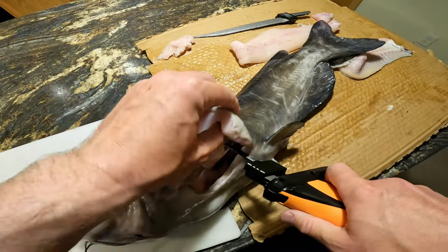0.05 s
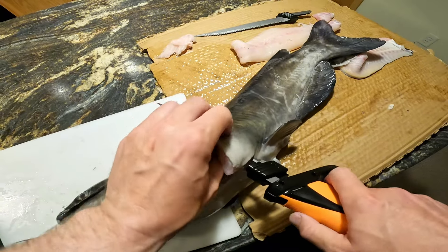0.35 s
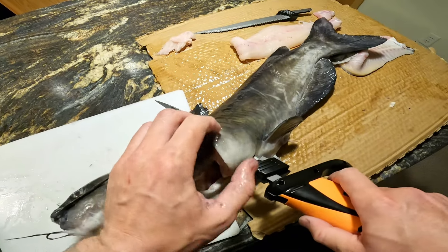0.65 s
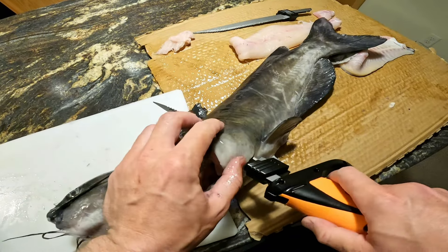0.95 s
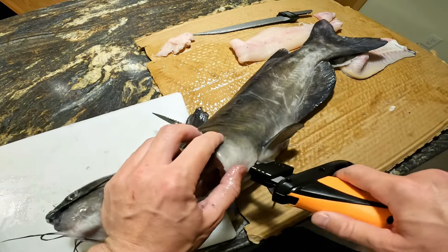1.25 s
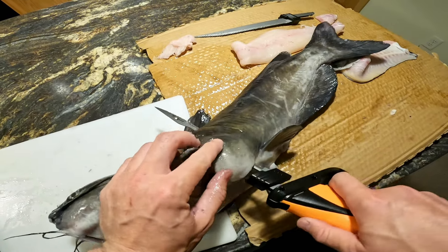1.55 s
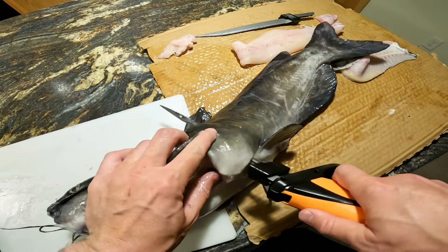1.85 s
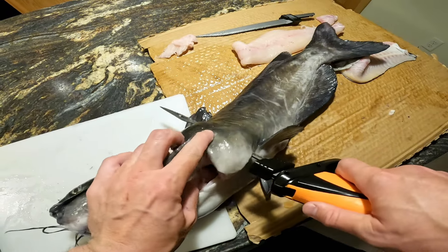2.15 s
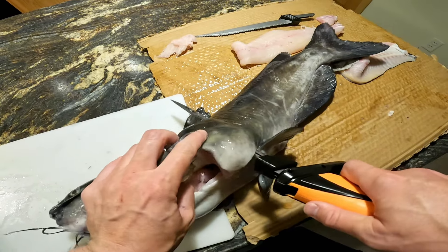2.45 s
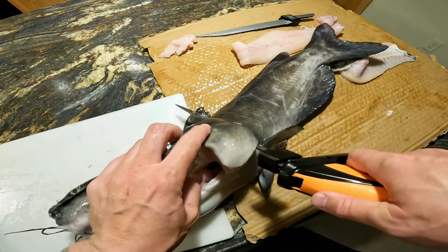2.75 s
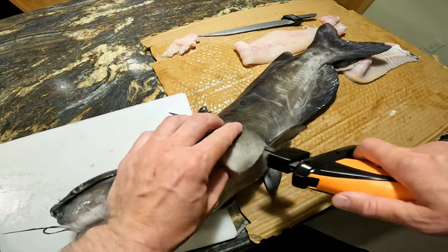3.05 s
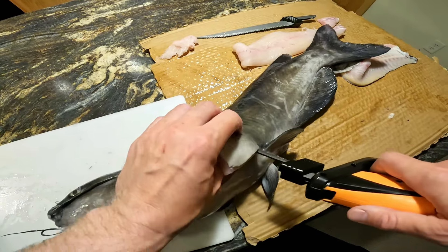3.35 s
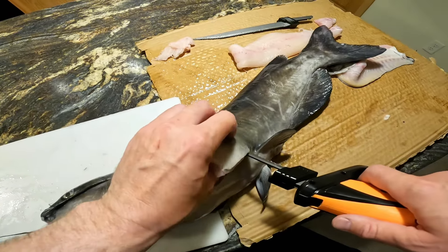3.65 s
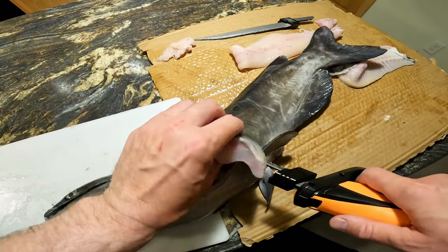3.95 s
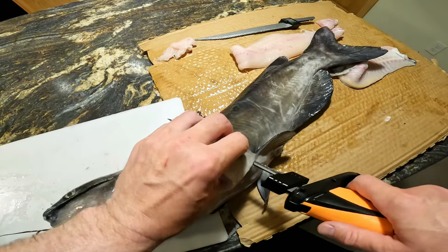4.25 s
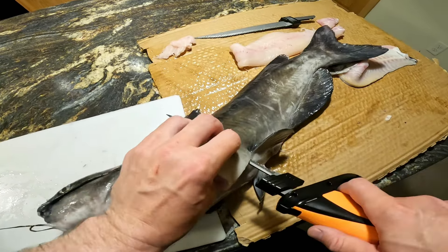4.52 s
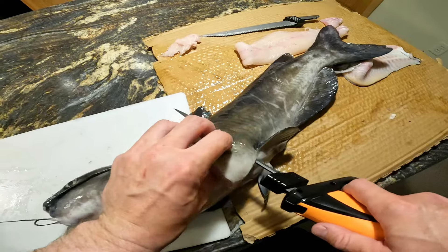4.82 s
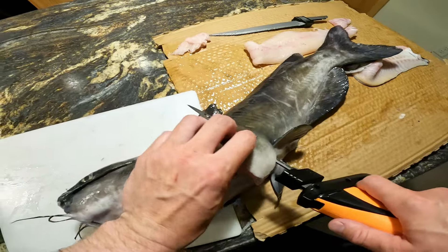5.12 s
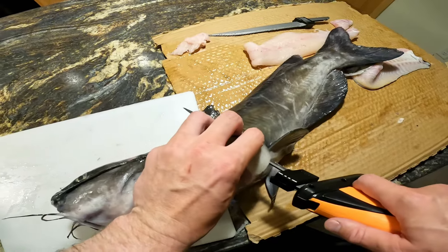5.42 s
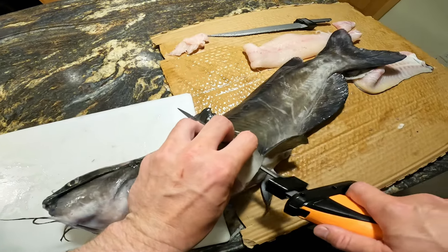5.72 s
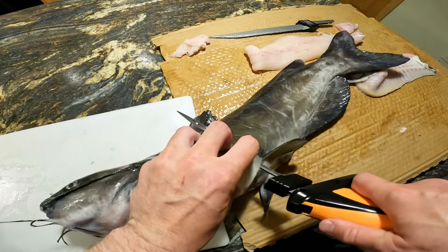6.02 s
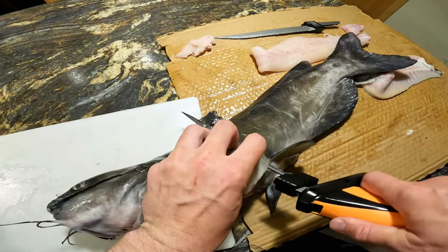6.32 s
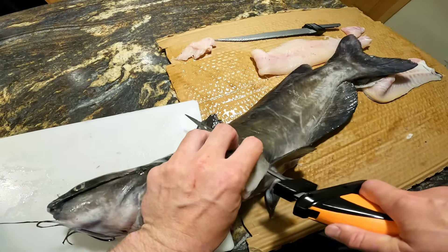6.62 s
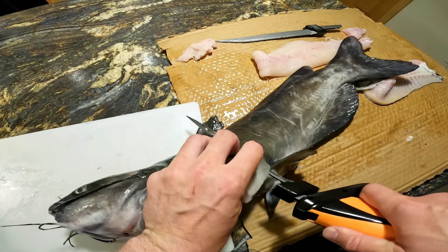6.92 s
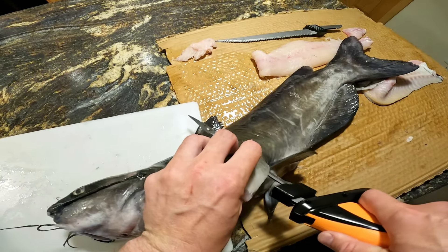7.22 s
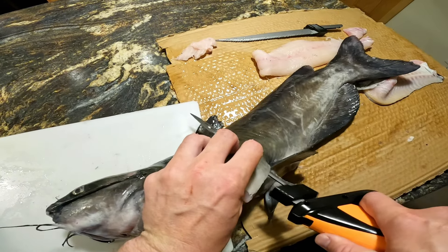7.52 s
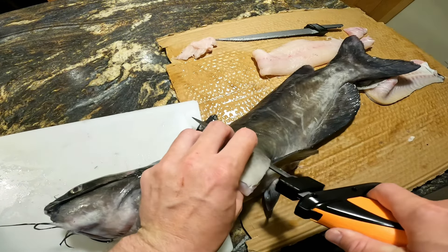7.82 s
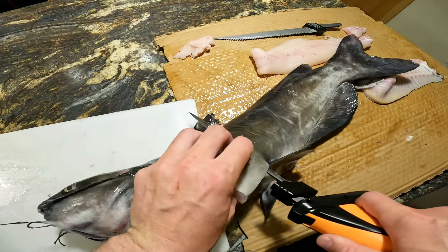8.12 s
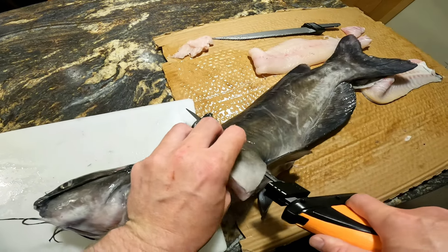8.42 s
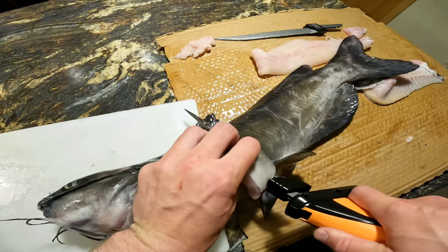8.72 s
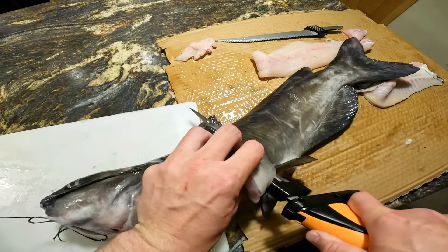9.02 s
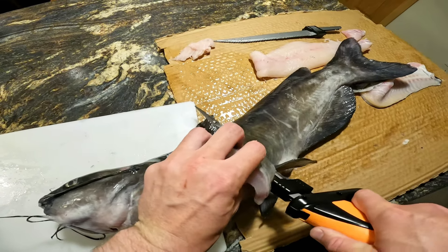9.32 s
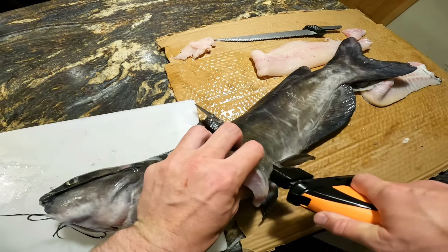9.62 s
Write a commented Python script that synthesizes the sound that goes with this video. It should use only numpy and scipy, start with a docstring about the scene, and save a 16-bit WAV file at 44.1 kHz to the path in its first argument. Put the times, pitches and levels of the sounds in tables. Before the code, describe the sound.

In a small room with a low ventilation hum, wet fish skin and small bones snap faintly under a hand. An electric fillet knife clicks on close to the microphone, buzzing, rattling and rasping through the fish, then whistles down to a stop. More small snaps and soft squelches follow. The knife runs again for longer, coasts down with a few clacks, and starts a third time near the end.

```python
"""At a counter in a small room, close by, an electric fillet knife runs three times through a fish.
A geared motor cranks two serrated blades to and fro: backlash makes them knock at each reversal,
sliding friction makes them rasp, and the gears sing at multiples of the crank rate until the knife
coasts to a stop. In the pauses wet skin and small bones snap under the hand, over the room's hum."""
import sys
import numpy as np
from scipy import signal
from scipy.fft import rfft, irfft
from scipy.io import wavfile
from scipy.ndimage import uniform_filter1d

SR = 44100
rng = np.random.default_rng(int(sys.argv[2]) if len(sys.argv) > 2 else 0)


def transcribe(u):
    """Save the signal u as a 16-bit wav file named by the first command-line argument.

    u: samples, shape (n,) or (channels, n), limited to [-1, 1]; the rate is SR.
    q: integer samples, one column per channel.
    """
    v = np.clip(np.atleast_2d(u).T, -1, 1)
    q = np.round(v * 32767).astype(np.int16)
    wavfile.write(sys.argv[1], SR, q)


N = 430416
TIME, FREQ = np.arange(N) / SR, np.fft.rfftfreq(N, 1 / SR)


def amp(db):
    """Amplitude ratio of a level in decibels."""
    return 10 ** (np.asarray(db) / 20)


def unit(x):
    """Normalisation to rms 1."""
    return x / np.sqrt(np.mean(x ** 2) + 1e-20)


def unit_pulse(x):
    """Normalisation to the energy of five milliseconds at rms 1."""
    return x / np.sqrt(np.sum(x ** 2) / (.005 * SR))


def curve(points, hz):
    """Interpolation on a logarithmic frequency axis."""
    f, value = np.transpose(points)
    return np.interp(np.log(hz + 1), np.log(f + 1), value)


def band(hz, lo_hz, hi_hz):
    """Band-pass magnitude with sixth-order edges."""
    return 1 / np.sqrt((1 + (lo_hz / (hz + 1)) ** 12) * (1 + (hz / hi_hz) ** 12))


def colour(x, gain):
    """Minimum-phase filter with the magnitude gain(hz)."""
    log_gain = np.log(np.maximum(gain(abs(np.fft.fftfreq(4096, 1 / SR))), 1e-5))
    taps = np.fft.ifft(np.exp(np.conj(signal.hilbert(log_gain)))).real[:2048]
    return signal.oaconvolve(x, taps)[:len(x)]


def drift(hz):
    """Random fluctuation: low-passed noise of rms 1."""
    return unit(irfft(rfft(rng.standard_normal(N)) / (1 + (FREQ / hz) ** 4), N))


def tone(turns, order, waver_db=2):
    """Random amplitude modulation of a sinusoid at one multiple of a rotation rate."""
    knots = np.arange(0, TIME[-1] + 1, 1 / 14)
    size = np.interp(TIME, knots, amp(waver_db * rng.standard_normal(len(knots))))
    return np.sqrt(2) * size * np.sin(2 * np.pi * (order * turns + rng.random()))


def add(mix, s, sound):
    """Superposition of a sound starting at s seconds."""
    part = mix[max(round(s * SR), 0):][:len(sound)]
    part += sound[:len(part)]


def during(start, end, edge_s):
    """Trapezoidal window from start to end."""
    return np.clip(np.minimum(TIME - start, end - TIME) / edge_s + .5, 0, 1)


def lifts(rows, edge_s):
    """Level envelopes, one a gain column, each row held from its start to its end."""
    return sum(np.outer(dbs, during(start, end, edge_s)) for start, end, *dbs in rows)


# ventilation spectrum: f/Hz, relative level/dB
VENTILATION = [(12, -29.5), (20, 2.5), (90, -8.5), (129, -6), (294, -6), (337, -3), (386, -12.5),
               (481, -12.5), (536, -17.5), (809, -29), (879, -31), (1220, -25), (2490, -44), (6320, -45),
               (14000, -63)]
# an appliance's hum and a thin whine: f/Hz, level/dB
HUM = [(59.2, -67), (91.5, -62), (118.4, -55), (344.5, -67), (473.7, -73), (1184, -77)]
THIN_WHINE = [(3494, -85)]
def background(air_db=-46, side_db=-22, hiss_db=-76):
    """Broadband ventilation noise and a line spectrum of hum, with hiss uncorrelated between the ears."""
    mid, side = (unit(colour(noise, lambda hz: amp(curve(VENTILATION, hz))))
                 for noise in rng.standard_normal((2, N)))
    air = mid + amp(side_db) * np.array([side, -side])
    hum = sum(amp(db) * tone(hz * TIME, order=1, waver_db=1.5) for hz, db in HUM + THIN_WHINE)
    hiss = np.array([unit(colour(noise, lambda hz: band(hz, 1700, 6700)))
                     for noise in rng.standard_normal((2, N))])
    return amp(air_db) * air + hum + amp(hiss_db) * hiss


# snaps of skin and bone, and trigger clicks: t/s, relative level/dB of the middle, low and top bands
SNAPS = [(0.1398, -54, -34.5, -58), (0.2688, -39, -56, -52), (0.7784, -49, -51, -61),
         (1.215, -53, -35.5, -65), (1.269, -42, -36, -70), (1.305, -53, -40, -74), (1.37, -60, -54, -60),
         (1.4694, -33, -33, -64), (1.5706, -32.5, -28.5, -48), (1.6192, -41, -37, -72),
         (3.728, -31, -34.5, -48), (3.8516, -28, -41, -49), (3.9774, -43, -66, -61),
         (4.1742, -27, -40, -46.5), (4.1892, -40, -56, -52), (4.2084, -27, -35, -46),
         (4.618, -23.5, -38, -45), (4.6498, -45, -55, -70), (4.7316, -43, -73, -56),
         (4.7459, -30, -33.5, -43), (4.8978, -51, -53, -58), (4.9147, -33.5, -34.5, -47),
         (4.996, -34, -38, -46.5), (5.4091, -64, -62, -55), (5.4805, -41, -35, -59),
         (5.5398, -30, -33, -47.5), (5.6, -56, -38.5, -72), (5.7179, -49, -38, -65),
         (8.3938, -44, -37, -60.5), (8.5589, -55, -57.5, -48), (8.8702, -34.5, -40, -50.5),
         (8.942, -47, -45, -72)]
TRIGGER_CLICKS = [(1.649, -24.5, -37, -51.5), (5.755, -46, -25, -57), (8.975, -29, -19.5, -35)]
# spectrum common to both: f/Hz, gain/dB
SNAP_SPECTRUM = [(410, -14.5), (700, -11), (2110, -7), (2550, -7), (2900, -11), (3350, -11), (3750, -5),
                 (4150, -11.5), (4700, -5), (7670, -11.5), (8370, -20.5), (12000, -20.5), (14000, -30)]
def snaps(rise_s=.00089, decay_s=.0013, tail_s=.016, tail_db=-24):
    """Impulsive excitation: each snap or click is a millisecond of crackle with a faint damped tail."""
    t, out = np.arange(3000) / SR, np.zeros(N)
    envelope = (1 - np.exp(-t / rise_s)) * (np.exp(-t / decay_s) + amp(tail_db) * np.exp(-t / tail_s))
    for s, middle, low, top in [*SNAPS, *TRIGGER_CLICKS]:
        tilt = [(1400, low + 3), (4200, middle - 5), (10000, top + 12)]
        spectrum = lambda hz: amp(curve(tilt, hz) + curve(SNAP_SPECTRUM, hz)) * band(hz, 500, 16000)
        burst = .54 * unit(rng.standard_normal(len(t)) * envelope)
        add(out, s, colour(burst, spectrum))
    return out


# wet flesh sliding under the fingers: t/s, duration/s, centre f/Hz, width/octaves, level/dB
SQUELCHES = [(0.393, 0.21, 4700, 0.78, -71.5), (1.114, 0.72, 3360, 0.78, -73),
             (3.882, 0.1, 5000, 0.19, -66), (3.974, 0.01, 4870, 0.12, -51.5),
             (3.844, 0.26, 9000, 0.77, -71.5), (4.62, 0.12, 4500, 0.44, -73),
             (4.976, 0.12, 4930, 0.68, -67), (8.451, 0.41, 4950, 0.59, -79)]
def squelches(grain_db=5):
    """Stick-slip friction: tiny sticky grains of noise swell and fade as the flesh slides."""
    out = np.zeros(N)
    for s, length, centre, width, db in SQUELCHES:
        count = int(length * SR)
        noise = rng.standard_normal(count)
        grains = amp(grain_db * unit(uniform_filter1d(rng.standard_normal(count), size=120)))
        sound = colour(noise * grains, lambda hz: np.exp(-.5 * (np.log2((hz + 1) / centre) / width) ** 2))
        add(out, s, amp(db) * unit(sound * np.hanning(count)))
    return out


# pulls of the trigger: pressed t/s, drive catches t/s, released t/s, coasting duration/s,
# base level/dB of rattle, clatter, scrape, sizzle, starting whine, unloaded gears
RUNS = [(1.648, 1.668, 2.9, .755, -28, -28, -26.5, -39, -25.5, -24),
        (5.753, 5.759, 7.79, .57, -29, -28, -27, -43, -21, -36),
        (8.975, 8.986, 10.0, .7, -28, -28, -28, -40, -23.5, -38)]
# crank rate under power, sagging with the load, one curve a run: t/s, f/Hz
CRANK_RATE = [
    [(1.85, 35.7), (2.03, 35.7), (2.18, 35.25), (2.36, 35.0), (2.44, 35.7), (2.58, 35.8), (2.64, 35.2),
     (2.8, 35.2), (2.9, 36.2)],
    [(5.92, 35.8), (5.976, 35.8), (6.084, 35.5), (6.724, 35.4), (6.93, 35.1), (7.21, 34.9), (7.76, 35.0)],
    [(9.15, 35.8), (9.204, 35.9), (9.404, 35.2), (9.474, 35.2), (9.616, 35.7), (9.74, 35.4)],
]
def motor(spin_up_s=.026, coast_power=1.2, slack_db=-9, catch_s=.0085, surge_s=.1, unload_s=.088):
    """Rotational inertia: the crank nears full speed exponentially; once released, friction stops it."""
    pressed, catch, released, coast, *_ = run_settings()
    time_on, time_off = np.maximum(TIME - pressed, 0), np.maximum(TIME - released, 0)
    slowing = np.maximum(1 - time_off / coast, 0) ** coast_power
    pace = (1 - np.exp(-time_on / spin_up_s)) * slowing  # share of full speed
    full_hz = np.interp(TIME, *np.concatenate(CRANK_RATE).T)
    turns = np.cumsum(pace * full_hz * (1 + .001 * drift(25))) / SR
    engaged = amp(slack_db * np.clip(1 - (TIME - catch) / catch_s, 0, 1))  # quiet until slack is taken up
    surge = np.exp(-time_on / surge_s)  # starting torque
    unloaded = np.minimum(time_off / unload_s, 1)
    return turns, pace, engaged, surge, unloaded


def current_run():
    """Step function of time: the index of the latest pull of the trigger."""
    return np.maximum(np.searchsorted([row[0] for row in RUNS], TIME) - 1, 0)


def run_settings():
    """Step functions of time: the columns of RUNS for the latest pull."""
    return np.array(RUNS)[current_run()].T


# impacts within one crank turn: phase/turns, relative level/dB in rattle, clatter, scrape, sizzle
KNOCKS = [(.03, -2, 0, 0, -3), (.125, 0, -8, -5, -9), (.22, -2, -11, -8, -3), (.53, -2, -1, -.5, -3),
          (.625, -1, -6, -5, -7), (.71, -3, -12, -10, -2)]
def knocks(turns, pace, part, ring_s, scatter_turns=.0012, spread_db=1.1, wander_rad=.17):
    """Backlash: slack is taken up at each reversal and the blades bounce, more softly when slow."""
    t, out = np.arange(1024) / SR, np.zeros(N)
    for phase, *dbs in KNOCKS:
        due = np.arange(int(turns[-1])) + phase
        late, size, step = rng.standard_normal((len(due), 3)).T
        at = np.minimum(np.searchsorted(turns, due + scatter_turns * late), N - 1)
        forces = amp(dbs[part] + spread_db * size) * pace[at] ** .48
        # the point of contact wanders slowly, blending two short rings
        first, second = (unit(rng.standard_normal(len(t)) * np.exp(-t / ring_s)) for _ in range(2))
        for s, force, contact in zip(TIME[at], forces, np.cumsum(wander_rad * step)):
            add(out, s, force * (np.cos(contact) * first + np.sin(contact) * second))
    return out / np.std(out[pace > .9])


def rasp(turns, pace, peak_phase, steady, fade_strokes=.4, profile_points=1250):
    """Sliding friction of serrations peaks once a stroke over a steady rub; two independent signals."""
    stroke = 2 * (turns - peak_phase) % 1
    periodic_share = .5 * pace ** 2  # the same teeth meet in every turn, so part of the noise repeats
    profile = rng.standard_normal((2, profile_points))
    periodic = np.sqrt(periodic_share) * profile[:, (turns % 1 * profile_points).astype(int)]
    aperiodic = np.sqrt(1 - periodic_share) * rng.standard_normal((2, N))
    return unit((steady + np.exp(-stroke / fade_strokes)) * (periodic + aperiodic))


# spectrum of the mechanism, one curve a run: f/Hz, gain/dB
BODY_SPECTRA = [
    [(120, -31.5), (200, -24.5), (280, 2.5), (312, -11), (422, 2), (461, -9), (541, 12), (745, 2),
     (939, 2.5), (2500, -8.5), (2830, -10), (5360, -12), (8660, -24.5), (10900, -21), (14000, -31.5)],
    [(120, -62.5), (200, -67.5), (280, 20.5), (312, -23.5), (461, 3), (602, 6.5), (815, 1), (922, 2),
     (1250, 4), (2050, -7.5), (2500, -6.5), (7380, -16.5), (8510, -27.5), (9300, -19), (10500, -19),
     (11400, -14), (14000, -25)],
    [(120, -44), (200, -19), (280, -9), (312, -22), (461, -28), (591, -4.5), (829, -8), (922, -5.5),
     (1480, -5.5), (2020, -9), (3150, -8), (3820, -7), (5460, -4.5), (8510, -16), (11700, -13),
     (14000, -25)],
]
# modes of the housing and blades: f/Hz, bandwidth/Hz, gain/dB
BODY_MODES = [(572, 98, 1.5), (911, 89, 7), (1250, 470, 7), (1700, 550, 3), (2490, 290, 4.5),
              (3117, 96, 4.5), (5400, 230, 2.5), (7300, 200, 4), (11800, 760, 1)]
def housing(x, run, lo_hz, hi_hz):
    """Resonance: the modes of housing and blades filter one band of the excitation."""
    def gain(hz):
        peaks_db = sum(db / (1 + (2 * (hz - f) / width) ** 2) for f, width, db in BODY_MODES)
        return amp(curve(BODY_SPECTRA[run], hz) + peaks_db) * band(hz, lo_hz, hi_hz)
    return colour(x, gain)


# gearbox rattle, blade clatter, scrape and edge sizzle: low f/Hz, high f/Hz, knock decay/s,
# ratio of rasp to knocks, phase of the rasp's peak/turns, ratio of steady rub to that peak
PARTS = [(400, 1800, .003, .9, .1, .7), (1800, 3600, .0016, 1.05, .02, .5),
         (3600, 8000, .0018, 1.1, .03, .3), (8000, 15000, .002, 1.5, .21, .6)]
# the teeth cross bone: start t/s, end t/s, gain/dB of sizzle, rumble
RIBS = [(2.267, 2.44, 3.5, 7.5), (2.44, 2.8, 1.5, -3), (7.093, 7.883, 4, -13)]
# the blades sink deep and the gears labour: start t/s, end t/s, gain/dB of drone, whine, clatter, scrape
BITES = [(2.08, 2.76, 3, -5, -0.47, -0.74), (6.06, 6.28, 4, -4, 0.3, -1.2), (6.55, 7.1, 1.5, 2, 0.76, -2),
         (7.39, 7.85, 0, 2.5, -0.16, 0.2), (9.2, 9.5, 1, 1, 0.4, -1.1)]
# the coasting blades ease out of the cut: start t/s, end t/s, gain/dB of rattle, clatter, scrape, sizzle
FREEING = [(2.95, 3.4, -0.5, -1, -1, 0.5), (3.48, 3.66, 2, 2, 1, 3), (7.81, 8.4, 2, -2.5, -2.5, 2.5)]
def mechanism(turns, pace, engaged, surge, unloaded, surge_db=8, rumble_db=-43):
    """Source and filter: knocks and rasp sound through the housing; on coasting the treble dies first."""
    stereo_widths, speed_powers = [.05, .079, .11, .8], [.78, 1, 1.37, 1.43]  # part by part
    sizzle_db, bone_db = lifts(RIBS, edge_s=.016)
    _, _, clatter_db, scrape_db = lifts(BITES, edge_s=.045)
    changes_db = np.array([surge_db * surge, clatter_db, scrape_db, sizzle_db]) + lifts(FREEING, .08)
    runs, out = current_run(), np.zeros((2, N))
    for part, (lo_hz, hi_hz, ring_s, rasp_share, peak_phase, steady) in enumerate(PARTS):
        rub, stray = rasp(turns, pace, peak_phase, steady)
        force = knocks(turns, pace, part, ring_s) + rasp_share * rub
        gain = engaged * amp(changes_db[part]) * pace ** speed_powers[part]
        for run, (_, _, _, _, *levels_db) in enumerate(RUNS):
            now = (runs == run) & (pace > 0)
            mid = housing(force[now], run, lo_hz, hi_hz)
            side = housing(stereo_widths[part] * stray[now], run, lo_hz, hi_hz)
            full_speed_rms = np.sqrt(np.mean((mid ** 2 + side ** 2)[pace[now] > .9]))
            stereo = np.array([mid + side, mid - side]) / full_speed_rms
            out[:, now] += stereo * amp(levels_db[part]) * gain[now]
    flesh, gears = rasp(turns, pace, peak_phase=.1, steady=.6)
    rumble = unit(colour(flesh, lambda hz: band(hz, 62, 635)))  # passed through the flesh to the counter
    out += rumble * amp(rumble_db + bone_db) * pace ** 1.43
    loose_gears = unit(colour(gears, lambda hz: band(hz, 1000, 1975)))
    *_, loose_db = run_settings()
    return out + loose_gears * amp(loose_db) * unloaded * pace ** 3.3


# tones of the gear train: multiple of the crank rate, base level/dB in the first, second and third run
GEAR_ORDERS = [(0.98, -41, -41.5, -42), (1.99, -49, -46, -51), (2.98, -47.5, -48.5, -45),
               (4.01, -46, -44, -42), (5, -50, -48.5, -47), (6, -55, -49, -56), (7.02, -49.5, -44, -43.5),
               (8, -42.5, -36.5, -40), (9, -49.5, -50, -49), (10.04, -46.5, -43, -42.5),
               (11, -53, -50, -51), (12, -46, -46, -46.5), (14, -46.5, -44.5, -49),
               (15, -42.5, -47.5, -41.5), (16, -55, -49, -43), (17, -53, -37.5, -38.5),
               (18, -46, -41, -37.5), (19, -45, -40, -40), (20, -58, -47, -56), (21, -58, -49.5, -46),
               (25, -54, -55, -52), (26, -47.5, -41, -43), (27, -57.5, -45, -47), (29, -52, -44.5, -49),
               (30, -51.5, -49.5, -51), (31, -54, -43, -48), (33.3, -41.5, -46, -56), (34, -54.5, -59, -47),
               (35, -61.5, -50.5, -44), (36, -47.5, -50, -48), (37, -57, -40, -46), (40, -48, -43, -44),
               (41, -50.5, -48, -39), (42, -49, -44, -58)]
# flesh grips the blades and the handle shakes more: start t/s, end t/s, gain/dB
DRAGS = [(1.86, 2.36, 7), (5.88, 7.39, 7), (9.42, 9.62, 4)]
# the blades bear on the board: start t/s, end t/s, gain/dB of throb, thrum, motor hum
PRESSES = [(2.404, 2.862, 6.5, 0.9, -0.5), (7.384, 7.81, 0.5, 13.8, -3.5)]
def vibration(turns, pace, engaged, surge, unloaded, surge_db=4, unloaded_db=-3.5):
    """Forced vibration: handle, board, motor and gears sound at multiples of the crank rate."""
    shake, = lifts(DRAGS, edge_s=.091)
    drone, whine, _, _ = lifts(BITES, edge_s=.08)
    throb, thrum, hum = lifts(PRESSES, edge_s=.054)
    groups = [([1], shake), ([2, 5], throb), ([3, 4], thrum), (range(6, 14), hum),
              (range(14, 23), drone), (range(23, 43), whine + surge_db * surge)]
    rough_turns = turns + .0015 * drift(60)  # free play of the gears
    runs, out = current_run(), np.zeros(N)
    for orders, lift_db in groups:
        voice = sum(amp(dbs)[runs] * tone(rough_turns, k) for k, *dbs in GEAR_ORDERS if round(k) in orders)
        out += voice * amp(lift_db)
    return out * engaged * amp(unloaded_db * unloaded) * pace ** 3.3


# the coasting whistle at each pitch it falls through: f/Hz, level/dB
WHISTLE = [(250, -81), (420, -48), (570, -40), (750, -44), (930, -32), (1080, -32.5), (1230, -45),
           (1400, -55)]
def armature(turns, pace, engaged, surge, unloaded, order=40):
    """Pitch follows rotation rate: the armature whines up at each start and whistles down on coasting."""
    rough_turns = turns + (.0017 + .005 * pace ** 2) * drift(55)  # free play of the gears
    *_, start_db, _ = run_settings()
    rising = amp(start_db) * engaged * surge * pace ** 2
    pitch_hz = order * SR * np.gradient(turns)
    falling = amp(curve(WHISTLE, pitch_hz)) * unloaded * (pace > 0)
    return tone(rough_turns, order, waver_db=5) * (rising + falling)


# modes of the steel: start t/s, end t/s, phase/turns, f/Hz, bandwidth/Hz, base level/dB
PINGS = [(1.71, 2.0, .03, 3780, 199, -31), (1.71, 2.9, 0.59, 1780, 263, -33.5),
         (1.98, 2.95, .03, 5400, 260, -34.5), (2.24, 2.68, 0.25, 10860, 1000, -31),
         (5.8, 7.05, 0.031, 2550, 260, -41), (5.8, 7.05, 0.68, 9150, 298, -38.5),
         (5.8, 7.05, 0.18, 11360, 395, -41), (6.1, 6.72, 0.42, 4260, 300, -32),
         (6.4, 7.0, 0.61, 4620, 300, -34), (7.07, 7.85, 0.026, 3130, 260, -30.5),
         (7.087, 7.81, 0.24, 7280, 900, -26.5), (7.091, 7.85, 0.79, 11270, 900, -34.5),
         (9.09, 9.46, 0.56, 3060, 270, -27.5), (9.02, 9.76, 0.64, 1470, 200, -31),
         (9.022, 9.6, 0.7, 11350, 900, -34.5)]
def pings(turns):
    """Damped free vibration: the steel rings once a turn, its pitch shifting with the flesh's grip."""
    t, out = TIME[:1024], np.zeros(N)
    grip = 1 + .008 * drift(6) + .012 * drift(40)
    for start, end, phase, hz, width, db in PINGS:
        for at in np.flatnonzero(np.diff(np.floor(turns - phase)) > 0):
            if start < TIME[at] < end:
                mode = t * np.exp(-np.pi * width * t) * np.sin(2 * np.pi * hz * grip[at] * t)
                add(out, TIME[at], amp(db + rng.uniform(-6, 3)) * unit_pulse(mode))
    return out


# tones of the gripped blades: start t/s, end t/s, lowest and highest harmonic, level/dB of each
BLADE_TONES = [(2.03, 2.42, 15, 17, -38), (2.3, 2.8, 15, 16, -40), (6.0, 6.45, 15, 15, -37),
               (5.95, 6.9, 36, 36, -38), (6.5, 7.39, 35, 35, -37), (6.88, 7.36, 33, 36, -37.5),
               (6.05, 7.35, 40, 40, -39), (6.3, 6.95, 51, 51, -43), (6.5, 7.7, 69, 72, -45)]
def blade_buzz(turns):
    """Periodic forcing: the gripped blades growl or buzz at high harmonics of the crank rate."""
    return sum(amp(db) * tone(turns, order) * during(start, end, edge_s=.11)
               for start, end, lowest, highest, db in BLADE_TONES for order in range(lowest, highest + 1))


# catches of the coasting blades: t/s, knock level/dB, clack level/dB
CLACKS = [(3.118, -28, -28), (3.188, -28, -32), (3.25, -34, -32), (3.275, -30, -32), (3.36, -30, -35),
          (3.45, -35, -39), (3.471, -35, -44), (3.538, -43, -46), (7.944, -33, -37), (8.044, -31, -29),
          (8.067, -27, -42), (8.085, -27, -35), (8.164, -33, -46), (8.202, -39, -37), (8.207, -35, -32),
          (8.329, -40, -56)]
def clacks(ring_s=.0042):
    """Impact noise: the slowing blades catch, each time with a low knock and a bright clack."""
    envelope, out = np.exp(-TIME[:2048] / ring_s), np.zeros(N)
    for s, knock_db, clack_db in CLACKS:
        for db, lo_hz, hi_hz in (knock_db, 670, 1570), (clack_db, 1700, 5700):
            burst = colour(rng.standard_normal(len(envelope)) * envelope, lambda hz: band(hz, lo_hz, hi_hz))
            add(out, s, amp(db) * unit_pulse(burst))
    return out


# interaural level difference: f/Hz, left minus right level/dB
EAR_DIFFERENCE = [(120, -.2), (250, -1), (1000, -1.6), (2200, -3), (4000, -1), (8000, .4)]
def place(x, delay_s=.00073):
    """Interaural difference sets the knife a little right; a counter reflection widens the treble."""
    left_db = curve(EAR_DIFFERENCE, FREQ) / 2
    bounce_db = curve([(100, -46), (600, -25), (5000, -31.5), (10000, -12)], FREQ)
    bounce = amp(bounce_db) * np.exp(-2j * np.pi * FREQ * delay_s)
    return irfft(rfft(x) * np.array([amp(left_db) + bounce, amp(-left_db) - bounce]), N)


# reverberation time of the room: f/Hz, T60/s
REVERB_TIME = [(150, 0.16), (1000, 0.1), (4000, 0.46), (12000, 0.011)]
def room(x, wet_db=-15, bass_wet_db=-22):
    """Reverberation: a diffuse tail, different in each ear, each band decaying at its own rate."""
    hz, t, spectra = signal.stft(rng.standard_normal((2, SR // 2)), SR, nperseg=256)
    decay = amp(-60 * t / curve(REVERB_TIME, hz)[:, None])
    _, tail = signal.istft(spectra * decay, SR, nperseg=256)
    tail[:, :200] = 0  # gap before the first reflection
    wet = signal.fftconvolve(x[None], tail / np.linalg.norm(tail[0]), axes=1)[:, :N]
    return irfft(rfft(wet) * amp(curve([(300, bass_wet_db), (3000, wet_db)], FREQ)), N)


def scene():
    """Superposition of direct sound, reverberation and background; the crank angle drives the knife."""
    drive = motor()
    turns = drive[0]
    knife = mechanism(*drive) + vibration(*drive) + armature(*drive)
    blades = pings(turns) + blade_buzz(turns) + clacks()
    direct = snaps() + squelches() + knife + blades
    return background() + place(direct) + room(direct.mean(0))


def record(dry, cutoff_hz=13550):
    """Band limiting: a linear-phase low-pass removes the highest treble."""
    taps = signal.firwin(161, cutoff_hz, window=("kaiser", 8), fs=SR)
    return signal.oaconvolve(dry, taps[None], "same")


dry = scene()
out = record(dry)
transcribe(out)
```